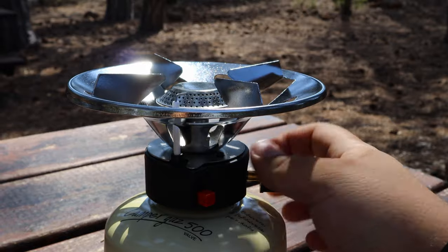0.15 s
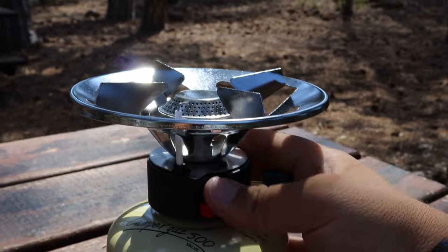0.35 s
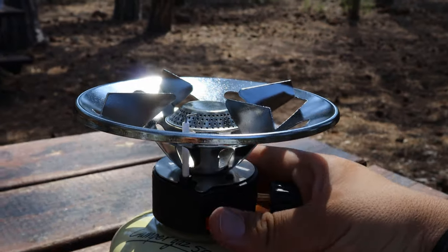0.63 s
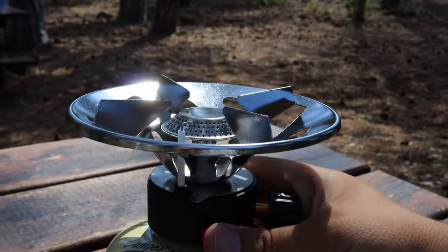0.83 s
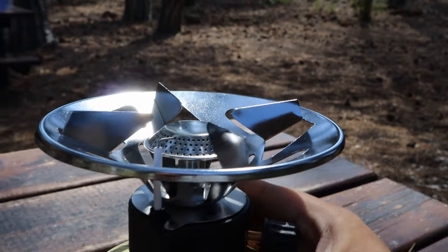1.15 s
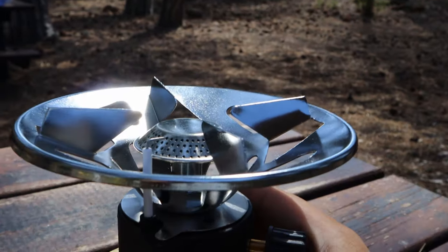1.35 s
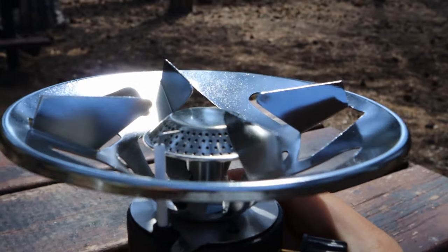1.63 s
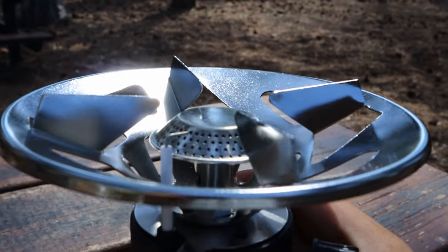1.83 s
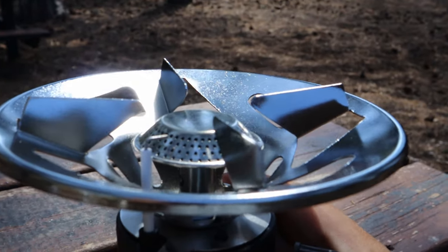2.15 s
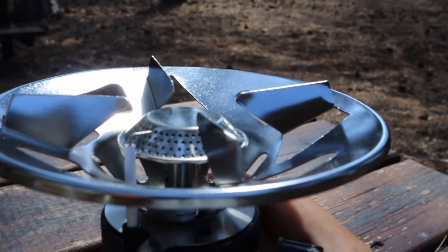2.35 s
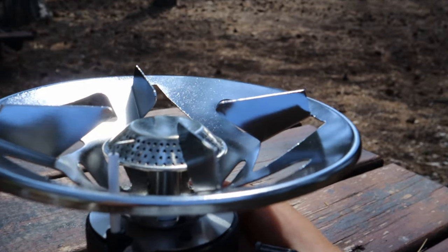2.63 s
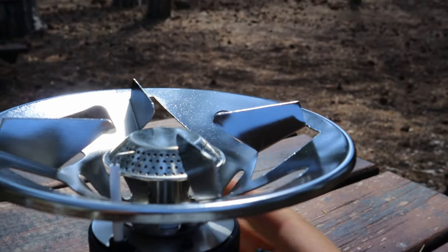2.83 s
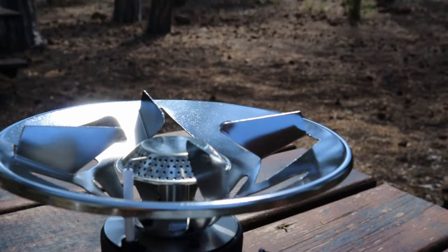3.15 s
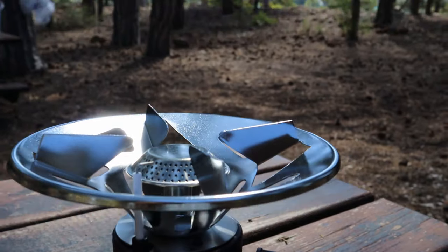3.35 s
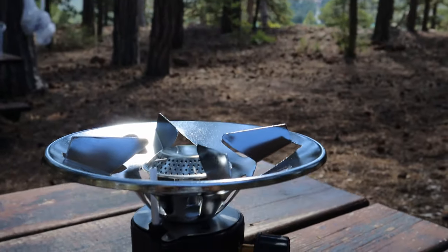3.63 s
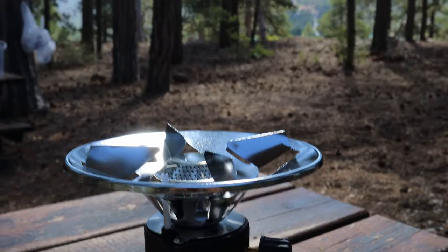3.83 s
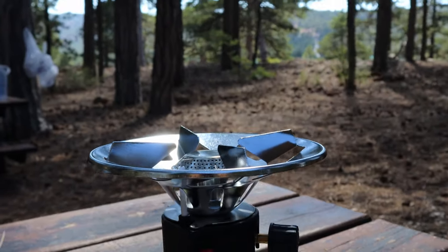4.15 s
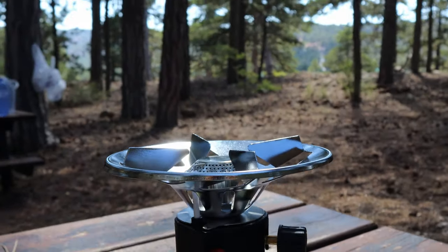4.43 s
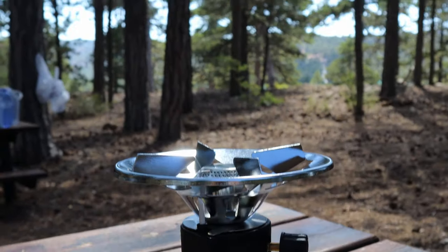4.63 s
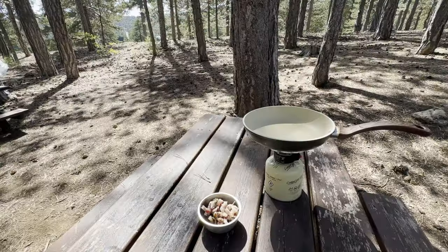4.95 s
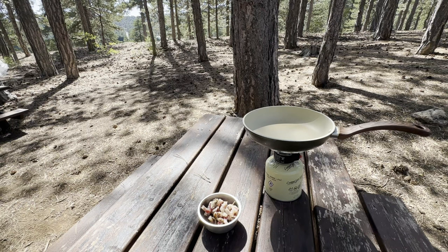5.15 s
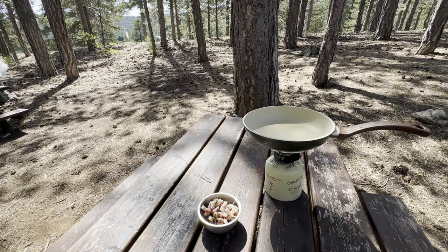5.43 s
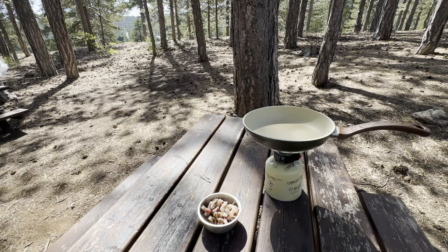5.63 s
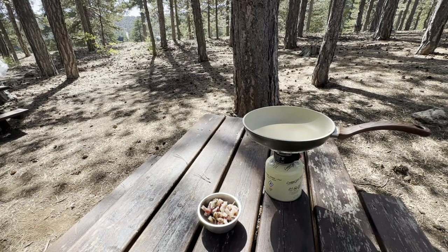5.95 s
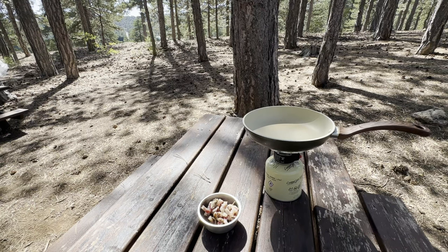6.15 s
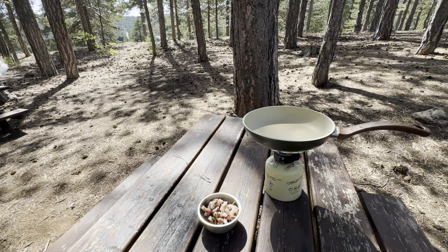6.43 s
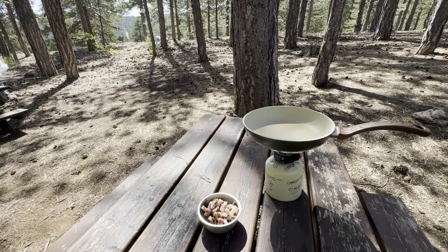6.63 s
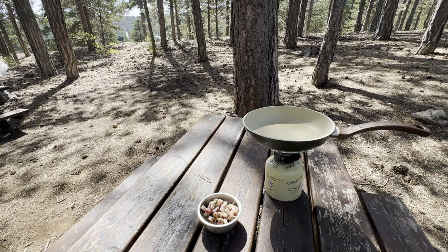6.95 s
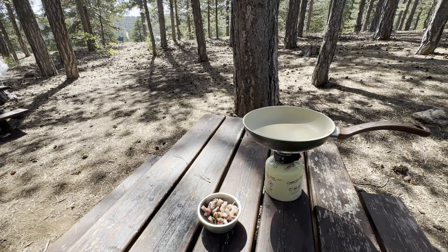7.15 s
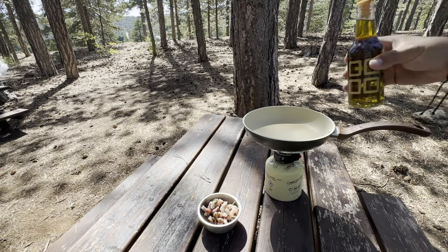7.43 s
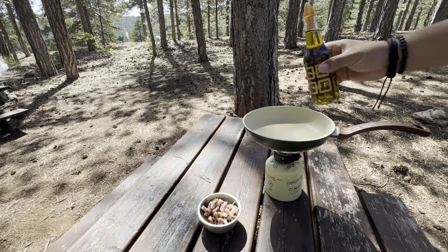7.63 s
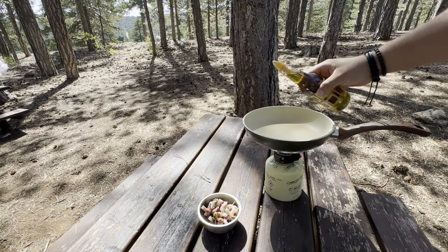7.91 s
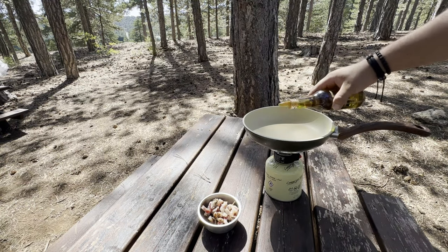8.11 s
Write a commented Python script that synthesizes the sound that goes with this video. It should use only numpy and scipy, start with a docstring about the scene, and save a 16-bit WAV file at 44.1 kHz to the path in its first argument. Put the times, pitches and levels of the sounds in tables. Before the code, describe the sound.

A bright, resonant gas jet blows near the microphone, rising in small steps while a hand faintly rubs and bumps the knob. A hard snap lights it; a second, softer click follows as the button springs back. The flame hisses, sizzles, rumbles and pops in gusts. After a sudden cut, the same stove burns thinly at a distance in quiet open air, its roar wavering with the breeze.

```python
"""Gas stove in a wood

Jet noise: cold gas hisses as the valve opens, its resonances gliding as the microphone nears.
Impact: knob, piezo igniter and the button springing back ring the modes of the stove body.
Combustion noise: the lit burner hisses, sizzles, roars and pops, shaped by gusts and swirling air.
After a cut the stove burns quietly under a pan, a few steps away; faint open air lies beneath."""
import sys
import numpy as np
from scipy import signal
from scipy.fft import rfft, irfft, next_fast_len
from scipy.io import wavfile
from scipy.ndimage import map_coordinates

SR = 44100
rng = np.random.default_rng(int(sys.argv[2]) if len(sys.argv) > 2 else 0)


def generate_wav(sig):
    """Save sig (samples, or channels by samples) to the path in sys.argv[1] as 16-bit PCM at SR."""
    pcm = np.round(np.clip(np.atleast_2d(sig).T, -1, 1) * 32767).astype(np.int16)
    wavfile.write(sys.argv[1], SR, pcm)


N = 365148

FRAME = 1024  # samples in a spectral frame
HZ = np.fft.rfftfreq(FRAME, 1 / SR)[:, None]
TIME = np.arange(N) / SR
FRAME_S = signal.stft(TIME, SR, nperseg=FRAME)[1]  # frame times

LIGHT_S, CUT_S = 1.995, 4.83  # the gas catches; the listening place changes
CATCH_S, SPREAD_S = 2.016, 0.029  # the flame spreads round the head at this time, this fast


def amp(db):
    """Level: decibels to amplitude gain."""
    return 10 ** (np.asarray(db) / 20)


def unit(x):
    """Normalization: x at rms 1."""
    return x / np.sqrt(np.mean(x ** 2) + 1e-20)


def along(points):
    """Spectral envelope: each column of a frequency table, joined on a log axis."""
    f, *cols = np.transpose(points)
    return np.array([np.interp(np.log(HZ + 1), np.log(f + 1), c) for c in cols])


def curves(rows, t=TIME):
    """Time envelope: each column of a time table at the times t."""
    s, *cols = np.transpose(rows)
    return np.array([np.interp(t, s, c) for c in cols])


def wobble(rate):
    """Random modulation: a smooth curve of rms 1 with rate knots a second."""
    knots = rng.standard_normal(int(N * rate / SR) + 4)
    return unit(map_coordinates(knots, [TIME * rate]))


def after(s, fade):
    """Smooth onset: rises from 0 to 1 around the time s."""
    return .5 + .5 * np.tanh((TIME - s) / fade)


def bell(hz, width_hz):
    """Resonance: a bump of height 1 on the frequency axis."""
    return 2 ** -(2 * (HZ - hz) / width_hz) ** 2


def swells(rows, attack_s, release_s, t=TIME):
    """Attack and release: events (start, length, values) rise, hold and fall; one curve per value."""
    start, length, *values = np.transpose(rows)[:, :, None]
    rise = 1 + np.tanh((t - start) / attack_s)
    fall = 1 - np.tanh((t - start - length) / release_s)
    return [np.sum(value * rise * fall / 4, axis=0) for value in values]


def rush(colour_db, ports, patchy_db, port_db=0):
    """Turbulence: coloured noise of rms 1 with drifting patches, partly coherent between two ports."""
    a, b = signal.stft(rng.standard_normal((2, N)), nperseg=FRAME)[2]
    patch_shape = np.outer(np.hanning(20), np.hanning(13))
    patches = signal.fftconvolve(rng.standard_normal(a.shape), patch_shape, "same")
    gain = amp(colour_db + patchy_db * unit(patches))
    # each frame keeps its total power; port_db then colours each port apart
    gain = gain / np.linalg.norm(gain, axis=0) * amp(port_db)
    pan_db, coherence, lag = along(ports)
    turn = np.arccos(np.clip(coherence, 0, 1)) / 2
    shared, apart = np.cos(turn) * a, np.sin(turn) * b
    lean = amp(pan_db / 2) * np.exp(-.5j * lag)
    pair = np.array([(shared + apart) * lean, (shared - apart) / lean])
    pair = pair / np.hypot(abs(lean), 1 / abs(lean))
    return unit(signal.istft(pair * gain, nperseg=FRAME)[1][:, :N])


def flame(colour_db, ports, flutter_db, flutter_rate):
    """Combustion noise: turbulence whose level comes in quick, uneven puffs."""
    puffs = amp(flutter_db * wobble(flutter_rate))
    return unit(rush(colour_db, ports, patchy_db=2.0) * puffs)


def lit_burner():
    """Superposition: burner hiss, plus a roar that sets in as the flame spreads round the head."""
    return lit_hiss() + after(CATCH_S, SPREAD_S) * flame_roar()


# wind gusts tear at the flame, and the button springing back shakes it at 2.48 s; it calms in the lulls: # t/s,
# length/s, roar rise/dB, rasp/dB, bass/dB
GUST_EVENTS = [(2.06, 0.15, 2.5, 9, 0), (2.36, 0.14, 5, -5, -16), (2.48, 0.091, 5.5, -5, -7),
               (2.62, 0.071, 6, 6.5, 6), (2.82, 0.09, 6, 5, 8), (2.92, 0.066, 7.5, 4, 8.5),
               (3.02, 0.31, -3, 5, 5), (3.28, 0.26, 7.5, 3.5, 3.5), (3.79, 0.055, 12.5, 4, -7),
               (3.89, 0.11, 4.5, -15, -8), (3.99, .06, -5.5, 6, 5), (4.07, 0.11, 3.5, 4.5, 3),
               (4.44, 0.12, 3.5, -11, 0), (4.61, 0.089, 10, 0.5, -6), (4.79, 0.11, 5.5, -2, 6),
               (5.42, 0.04, 9.5, 0, 0), (6.66, 0.043, 4.5, -3, 0), (6.83, 0.15, 5, 0, -1),
               (7.72, 0.032, 6, 4, 2)]


def gusts(t):
    """Forcing by wind and by the button's knock: rise of the roar, of its rasp and of its bass in dB at the
    times t."""
    return swells(GUST_EVENTS, attack_s=0.014, release_s=0.039, t=t)


# spectrum of the close roar: f/Hz, level/dB
ROAR_SPECTRUM = [(20, -36), (50, -13), (100, -8.5), (160, -0.5), (220, -0.5), (320, -3), (430, -10),
                 (680, -8.5), (900, -17), (1400, -17), (2000, -24), (3000, -40), (9000, -85)]
# the two ports beside the lit burner: f/Hz, left minus right/dB, coherence/1, left lag/rad
LIT_PORT_PAIR = [(200, 0, .99, 0), (600, -2.3, .98, 0), (1100, -5.5, .82, -.2), (1950, -2, .75, .2),
                 (2400, -6, .8, .4), (2850, -19, .7, 1.4), (3400, -8, .8, .3), (4300, -3, .8, .65),
                 (5100, 2, .82, 1.1), (5900, 3, .9, 2), (7100, 4, .75, 2.3), (8000, 2, .92, 2.8),
                 (8500, 0, 1, 3.14), (9400, 0, 1, 3.14), (10000, .5, .98, 3.11), (11700, .5, .965, 3.07),
                 (12400, 0, 1, 3.14)]
ROAR_DB, ROAR_BASS_DB, ROAR_RASP_DB = -33, -0.5, -3  # between gusts: level, bass, rasp


def flame_roar():
    """Combustion noise: the close flame roars, each gust changing its level and colour."""
    _, rasp_db, bass_db = gusts(FRAME_S)
    bass_tone_db = (ROAR_BASS_DB + bass_db) * bell(100, width_hz=130)
    rasp_tone_db = (ROAR_RASP_DB + rasp_db) * bell(1180, width_hz=820)
    colour_db = along(ROAR_SPECTRUM)[0] + bass_tone_db + rasp_tone_db
    roar = flame(colour_db, LIT_PORT_PAIR, flutter_db=1.3, flutter_rate=70)
    return amp(ROAR_DB + gusts(TIME)[0]) * roar


# the head swishes, or briefly falls away, as hot air swirls round it:
# t/s, length/s, head/dB, broad rush/dB, pot support ring/dB
SWISH_EVENTS = [(2.05, 0.086, 13.5, 2, 1), (2.16, .04, 8, -1, 0), (2.37, 0.084, 12, 4.5, 2),
                (2.46, 0.062, -8, 1.5, 0), (2.535, 0.081, 8.5, -1, -6), (2.67, .11, 7.5, -1.5, 15),
                (2.79, 0.094, 6.5, -1, -3), (2.9, 0.058, 4, -3.5, 1), (3.055, 0.18, 11.5, 2, 1),
                (3.23, 0.062, 6, -1.5, 5), (3.94, 0.095, -1, 0, 8), (4.06, 0.052, -6, -5.5, 7),
                (4.14, 0.086, 1, 0, 4)]


def swishes(t=TIME):
    """Turbulent modulation: change of head, of rush and of pot support ring in dB at the times t."""
    return swells(SWISH_EVENTS, attack_s=0.027, release_s=0.02, t=t)


# steady hiss as the microphone moves round the burner: t/s, rush level/dB, head level/dB
HISS_LEVELS = [(2.1, -26.5, -35), (2.42, -25.5, -29.5), (2.9, -27.5, -28.5), (3.1, -24.5, -29.5),
               (3.45, -23, -25.5), (3.7, -22.5, -24.5), (4.05, -24, -19), (4.3, -23.5, -20.5),
               (4.8, -26, -23)]
# wandering resonances of the hot burner: t/s, head f/Hz, tube f/Hz, sizzle f/Hz
BURNER_RESONANCES = [(2.1, 6300, 3950, 11700), (2.2, 5750, 3850, 11500), (2.32, 6000, 3780, 11200),
                     (2.44, 5680, 3780, 11000), (2.54, 6120, 4000, 11300), (2.6, 5900, 4050, 11350),
                     (2.73, 6280, 4080, 11900), (2.93, 5780, 3800, 11500), (3.14, 5900, 4150, 11650),
                     (3.27, 6080, 4200, 11400), (3.56, 5700, 4000, 11100), (3.9, 5780, 4150, 11050),
                     (4.05, 6020, 4340, 11750), (4.22, 6020, 3450, 11650), (4.5, 5800, 3550, 11050),
                     (4.75, 5930, 3680, 11350)]
# the microphone leans in to the burner and draws back: t/s, closeness/1
MIC_CLOSENESS = [(2.1, 0), (2.5, 0.9), (2.92, 0.9), (3.08, 0.25), (4.1, 0.15), (4.8, 0.2)]
# narrow bands lifted by the steel pot support: f/Hz, width/Hz, level/dB
SUPPORT_BANDS = [(2250, 500, 2.5), (2900, 260, 0.5), (5000, 320, 4.5), (6900, 400, 6.5)]
# spectra of the broad rush and of the burner head: f/Hz, level/dB
RUSH_SPECTRUM = [(400, -11), (1000, -27), (1600, -9.5), (1950, -16.5), (2400, -7), (3300, 1.5), (4000, 2.5),
                 (4700, 2.5), (6000, -7.5), (7500, -13), (9000, -59), (13000, -43)]
HEAD_SPECTRUM = [(3500, -37.5), (4800, 3.5), (5400, 12.5), (6250, 6.5), (6750, -6), (7500, -7), (8500, -56),
                 (12000, -60)]
GUST_DUCK = 0.057  # dB of rush and head lost per dB of roar gained
DIP_DB, RECOVER_S, RECOVER_FADE_S = -10, 2.055, .016  # the hiss dips briefly after the click, then recovers
# drawn back, the right port hears a reflection cancel one band
SHADOW_DB, SHADOW_S, SHADOW_HZ, SHADOW_WIDTH_HZ = -7, 4.6, 4400, 120


def lit_hiss():
    """Resonant jet noise: dipping after the click, it swishes in hot air while its resonances wander."""
    swish_db, surge_db, _ = swishes()
    rush_db, head_db = curves(HISS_LEVELS) + [surge_db, swish_db] - GUST_DUCK * gusts(TIME)[0]
    head_hz, tube_hz, sizzle_hz = curves(BURNER_RESONANCES, FRAME_S)
    close, = curves(MIC_CLOSENESS, FRAME_S)
    # right at the burner the resonances stand out, and the hiss between them turns hollow
    hollow_db = -10 * close * bell(1.17 * tube_hz, width_hz=550)
    hollow_db = hollow_db - 6 * close * bell(0.887 * head_hz, width_hz=840)
    head_ring_db = (4 + 5 * close) * bell(head_hz, width_hz=580)
    tube_ring_db = (2 + 4 * close) * bell(tube_hz, width_hz=580)
    support_ring_db = swishes(FRAME_S)[2] * bell(4800, width_hz=300)
    support_db = sum(db * bell(hz, width) for hz, width, db in SUPPORT_BANDS) + support_ring_db

    drawn_back = np.interp(FRAME_S, TIME, after(SHADOW_S, fade=0.042))
    shadow_db = SHADOW_DB * drawn_back * bell(SHADOW_HZ, SHADOW_WIDTH_HZ)
    # the tube faces the right port
    port_db = np.array([0.83 * tube_ring_db, tube_ring_db + shadow_db])
    body_colour_db = along(RUSH_SPECTRUM)[0] + support_db + hollow_db
    body = amp(rush_db) * rush(body_colour_db, LIT_PORT_PAIR, patchy_db=1.5, port_db=port_db)

    head_colour_db = along(HEAD_SPECTRUM)[0] + head_ring_db + support_ring_db + hollow_db
    head = amp(head_db) * rush(head_colour_db, LIT_PORT_PAIR, patchy_db=4.0)
    # up close, the head faces the left port
    head = head * amp(np.outer([1.2, -6.5], curves(MIC_CLOSENESS)[0]))
    head = head * amp(1.07 * wobble(rate=35))  # flutter

    dip = amp(DIP_DB * (1 - after(RECOVER_S, RECOVER_FADE_S)))
    return dip * (body + head + burner_sizzle(sizzle_hz, swish_db))


# fine sizzle before swish and flicker: t/s, level/dB
SIZZLE_LEVELS = [(2.14, -36), (2.26, -42), (2.34, -35.5), (2.45, -39), (2.75, -38.5), (2.93, -42),
                 (3.2, -32), (3.45, -30.5), (3.7, -33.5), (4.1, -34), (4.24, -30), (4.5, -33.5),
                 (4.8, -35.5)]
# its spectrum: f/Hz, level/dB
SIZZLE_SPECTRUM = [(5000, -40), (7800, -5), (8700, -8), (9400, -7), (10200, -1.5), (11200, -2), (12000, -8),
                   (12800, -24), (13900, -19), (15200, -45)]
SIZZLE_FOLLOWS = 0.25  # dB of sizzle per dB of swish


def burner_sizzle(sizzle_hz, swish_db):
    """Fine-scale turbulence: flickering treble noise with a wandering resonance."""
    level_db = curves(SIZZLE_LEVELS)[0] + SIZZLE_FOLLOWS * swish_db + 3.9 * wobble(rate=32)
    ring_db = 8 * bell(sizzle_hz, width_hz=620)
    return amp(level_db) * rush(along(SIZZLE_SPECTRUM)[0] + ring_db, LIT_PORT_PAIR, patchy_db=2.5)


# the loud pops of the flame: t/s, peak level/dB
LOUD_POPS = [(1.989, -26), (2.51, -20), (2.947, -19), (2.965, -18), (3.467, -18), (3.514, -15.5),
             (3.819, -17), (3.838, -15.5), (3.9206, -14), (4.637, -15), (4.673, -13.5)]
POP_S, SMALL_POP_DB = 0.00068, -27.5  # typical half length; typical small peak between gusts


def flame_pops():
    """Volume collapse: pockets of flame give dull pulses, the many small ones growing with the gusts."""
    times = rng.uniform(CATCH_S + SPREAD_S, CUT_S, size=110)
    levels = SMALL_POP_DB + gusts(times)[0] + rng.normal(0, 1.7, len(times))
    out = np.zeros(N)
    for s, db in [*LOUD_POPS, *zip(times, levels)]:
        near = slice(round((s - .01) * SR), round((s + .01) * SR))
        half_s = POP_S * np.exp(rng.normal(0, .14))
        u = (TIME[near] - s) / half_s
        out[near] -= amp(db) * (1 - u ** 2) * np.exp(-u ** 2 / 2)
    return out


# resonances of the cold hiss glide, most of them downward, as the microphone nears:
# f at first/Hz, f at lighting/Hz, width/Hz, level/dB
JET_RESONANCES = [(1560, 1360, 230, 7), (2200, 2320, 130, 2), (3190, 2400, 540, 4.5), (4260, 4000, 170, 3),
                  (5560, 5390, 660, 8.5)]
# reflections shape gliding bands as the microphone nears:
# f at first/Hz, f at lighting/Hz, width/Hz, left level/dB, right level/dB
GLIDING_BANDS = [(2590, 1950, 270, 1, -4), (3750, 3500, 200, -1.5, -2.5), (3640, 2700, 490, -5, 0),
                 (7650, 6900, 600, -1.5, -3)]
# spectrum of the cold jet: f/Hz, level/dB
JET_SPECTRUM = [(100, -26), (300, -21.5), (1000, -19.5), (1900, -16), (3000, -5.5), (4500, -2.5),
                (5700, -6), (7000, -8), (8600, -15), (9800, -3.5), (10800, 1), (11400, -18), (12200, -21),
                (12800, -29), (13400, -25), (14000, -31), (14400, -55)]
# the two ports before lighting: f/Hz, left minus right/dB, coherence/1, left lag/rad
JET_PORT_PAIR = [(200, 0, .93, 0), (900, -3, .65, .1), (1500, -7, .85, .2), (2200, -5.5, .8, .4),
                 (2900, -13, .8, 1.2), (3400, -7, .9, .3), (4300, -2, .92, .45), (5600, 3, .96, 1.35),
                 (7000, 4, .87, 2.1), (8500, 0, .99, 3), (10500, 1.5, .98, 3), (11200, 0, .999, 3.14)]
# each turn of the valve lets more gas through: t/s, rise/dB
VALVE_TURNS = [(.26, 1.0), (1.04, 1.38), (1.42, 1.35), (1.72, 1.5)]
JET_DB, TURN_S = -20.5, 0.061  # hiss before the turns; how gradually a turn takes hold


def unlit_jet():
    """Jet noise: cold gas blows through the mixer tube; resonances glide as the microphone nears."""
    glide = np.clip(FRAME_S / LIGHT_S, 0, 1) ** 2.0  # 0 at first, 1 at lighting
    resonance_db, bands_db = 0, 0
    for first, last, width, db in JET_RESONANCES:
        resonance_db = resonance_db + db * bell(first + (last - first) * glide, width)
    for first, last, width, *sides_db in GLIDING_BANDS:
        bands_db = bands_db + np.multiply.outer(sides_db, bell(first + (last - first) * glide, width))
    colour_db = along(JET_SPECTRUM)[0] + resonance_db
    hiss = rush(colour_db, JET_PORT_PAIR, patchy_db=0.9, port_db=bands_db)
    opened_db = sum(db * after(s, TURN_S) for s, db in VALVE_TURNS)
    return hiss * amp(JET_DB + opened_db + 0.15 * wobble(24.46))


# valve knob and igniter knock the stove:
# t/s, relative level/dB, contact brightness f/Hz, crack/dB, thud/dB
STOVE_KNOCKS = [(.9, -28, 650, -45, 8), (1.126, -20.5, 640, -45, 9), (1.171, -28, 650, -45, 9),
                (1.9863, -10.5, 6000, 5.5, 1), (2.483, -12, 2600, -0.5, 5.5)]
# modes of the stove body: f/Hz, level/dB, t60/s, left minus right/dB
BODY_MODES = [(743, -8.5, .055, -2.5), (1480, 2.5, .018, -7), (1870, -17, .06, -4), (2390, -12, .05, -3),
              (2810, -19.5, .25, -6), (3074, 0, .016, -6), (3410, -10, .035, -5), (4064, -11, .05, -4),
              (4200, 9, .011, -4), (5146, -21, .1, 2), (5900, 6, .012, 5), (6503, -21, .08, 3)]
CRACK_S, RATTLE_S, RATTLE_DB = .009, .1, -22  # t60 of the blow; t60 and level of rattling loose parts
THUD_BELOW_HZ = 1000  # a thud lifts the modes under this pitch


def knocks():
    """Modal impact: blows ring the body; hard contacts crack, soft ones stir chiefly its lowest mode."""
    out, t = np.zeros((2, N)), np.arange(SR // 3) / SR
    hz, mode_db, t60, pan_db = np.transpose(BODY_MODES)[:, :, None]
    for s, db, bright_hz, crack_db, thud_db in STOVE_KNOCKS:
        blow_db = mode_db + thud_db * (hz < THUD_BELOW_HZ) + rng.normal(0, 1.0, hz.shape)
        strength = amp(blow_db) / np.hypot(1, (hz / bright_hz) ** 2)
        life = amp(-60 * t / t60) * (1 - np.exp(-t * hz))  # each mode builds up over about one cycle
        modes = strength * life * np.sin(2 * np.pi * (hz * t + rng.random(hz.shape)))
        ring = amp(np.hstack([pan_db, -pan_db]).T / 2) @ modes

        edges_hz = [1300, np.clip(2 * bright_hz, 2500, 13000)]
        b, a = signal.butter(2, edges_hz, "band", fs=SR)
        snap = signal.lfilter(b, a, rng.standard_normal((3, len(t))))
        stereo_snap = unit(snap[0] + 2.0 * snap[1:])  # one shared noise, one for each port
        dying = amp(-60 * t / CRACK_S) + amp(RATTLE_DB - 60 * t / RATTLE_S)
        crack = amp(crack_db) * dying * (1 - np.exp(-t / 0.00022)) * stereo_snap
        out[:, round(s * SR):][:, :len(t)] += amp(db) * (ring + crack)
    return out


# the hand on the valve knob rubs faintly: t/s, level/dB
HAND_LEVELS = [(.35, -84), (.6, -54), (.78, -47), (1.0, -51), (1.2, -57), (1.5, -69)]
# spectrum of the rubbing: f/Hz, level/dB
HAND_SPECTRUM = [(100, -32), (170, -20), (220, 6), (290, -8), (500, -32), (1000, -55)]


def hand():
    """Friction noise: fingers turning the knob make the canister rumble."""
    rumble = rush(along(HAND_SPECTRUM)[0], JET_PORT_PAIR, patchy_db=0)
    return amp(curves(HAND_LEVELS)[0]) * rumble


# the breeze sets the distant roar, to which gusts add: t/s, level/dB
BREEZE_LEVELS = [(5.04, -58), (5.17, -44.5), (5.47, -48), (5.66, -59), (5.98, -51), (6.22, -45.5),
                 (6.85, -44.5), (8.27, -44.5)]
# the distant hiss swells slowly as the air moves: t/s, level/dB, ring of the burner head/dB
FAR_HISS_LEVELS = [(4.9, -44, 1), (5.4, -44, -1), (5.9, -43.5, 3), (6.4, -44.5, -2), (6.7, -44, -1),
                   (7.0, -46, -2), (7.45, -44.5, -2.5), (7.9, -43.5, 2), (8.27, -44.5, 3)]
# reflections from pan and table cancel narrow bands: f/Hz, width/Hz, level/dB
PAN_NOTCHES = [(2080, 330, -10), (3110, 170, -15), (3650, 130, -6), (4180, 120, -6), (5220, 150, -11),
               (5850, 200, -3), (7570, 260, -13)]
# spectra of the distant hiss, sizzle and roar: f/Hz, level/dB
FAR_HISS_SPECTRUM = [(400, -20), (1000, -15.5), (1500, -16.5), (2200, -17.5), (2750, -15.5), (3300, -16),
                     (4000, -8), (4900, -3.5), (5900, -3), (6350, 1.5), (7150, -4), (8300, -19),
                     (9200, -33), (12000, -45)]
FAR_SIZZLE_SPECTRUM = [(8500, -38), (9700, -11), (10400, 0), (11500, 3), (12200, 0), (12900, 1),
                       (13500, -8), (14700, -3), (15400, -1), (15900, -1.5)]
FAR_ROAR_SPECTRUM = [(25, -30), (55, -15), (95, -17.5), (180, 0.5), (300, -0.5), (410, 2), (530, -7),
                     (680, -19.5), (1100, -32), (2000, -33), (4000, -59)]
# the two ports a few steps away: f/Hz, left minus right/dB, coherence/1, left lag/rad
FAR_PORT_PAIR = [(150, 0, .96, 0), (430, 2.5, .95, .15), (750, -7, .5, .9), (1100, -3, .85, .3),
                 (1600, -6, .65, .8), (2700, -1, .8, 0), (4200, -1, .75, -.5), (5100, 4, .65, -.9),
                 (6000, 7, .78, -2.7), (7400, 9, .6, -1), (8500, 0, .6, .3), (10200, 0, .99, 0)]
# the flame turns raspier at the height of the breeze: by how much, when, half length to 1/e
FAR_RASP_DB, FAR_RASP_S, FAR_RASP_SPAN_S = 14.5, 7.23, 0.66
FAR_SIZZLE_DB, FAR_SIZZLE_FOLLOWS = -55, 0.21  # level in the full breeze; dB per dB of breeze


def distant_burner():
    """Interference and forcing: pan and table notch the hiss while the flame flutters in the breeze."""
    breeze_db, = curves(BREEZE_LEVELS)
    notch_db = sum(db * bell(hz, width) for hz, width, db in PAN_NOTCHES)
    ring_db = curves(FAR_HISS_LEVELS, FRAME_S)[1] * bell(5000, width_hz=960)
    hiss_colour_db = along(FAR_HISS_SPECTRUM)[0] + notch_db + ring_db
    hiss = amp(curves(FAR_HISS_LEVELS)[0]) * rush(hiss_colour_db, FAR_PORT_PAIR, patchy_db=1.5)

    sizzle_db = FAR_SIZZLE_DB + FAR_SIZZLE_FOLLOWS * (breeze_db - breeze_db.max()) + 0.83 * wobble(3.2)
    sizzle = amp(sizzle_db) * rush(along(FAR_SIZZLE_SPECTRUM)[0], FAR_PORT_PAIR, patchy_db=4.5)

    windy = np.exp(-((FRAME_S - FAR_RASP_S) / FAR_RASP_SPAN_S) ** 2)
    rasp_db = FAR_RASP_DB * windy * bell(1040, width_hz=590)
    roar_colour_db = along(FAR_ROAR_SPECTRUM)[0] + rasp_db
    roar = flame(roar_colour_db, FAR_PORT_PAIR, flutter_db=1.45, flutter_rate=60)
    return hiss + sizzle + amp(breeze_db + gusts(TIME)[0]) * roar


# spectrum of the open air: f/Hz, level/dB
AIR_SPECTRUM = [(20, -9), (52, 3), (90, -6), (130, 2), (200, -5.5), (400, -31), (1500, -34)]


def forest_air():
    """Ambient turbulence: a low rumble of open air."""
    return rush(along(AIR_SPECTRUM)[0], JET_PORT_PAIR, patchy_db=-2.0)


def scene():
    """Superposition and crossfade: unlit gas, then the close flame, then the stove from further off."""
    lit, away = after(LIGHT_S, fade=0.0029), after(CUT_S, fade=0.001)
    air = forest_air()
    burner = (1 - lit) * unlit_jet() + lit * lit_burner()
    close = burner + flame_pops() + knocks() + hand() + amp(-50.0) * air
    distant = distant_burner() + amp(-59.0) * air
    return (1 - away) * close + away * distant


def record(dry):
    """Band limiting and saturation: cuts the deepest bass, rounds peaks near full scale, ends the treble."""
    top_hz = 15800
    trimmed = signal.lfilter(*signal.butter(3, 30, "high", fs=SR), dry)
    held = trimmed / (1 + np.abs(trimmed) ** 12) ** (1 / 12)
    size = next_fast_len(N + SR // 2)
    passed = np.fft.rfftfreq(size, 1 / SR) < top_hz
    return irfft(rfft(held, size) * passed, size)[:, :N]


dry = scene()
out = record(dry)
generate_wav(out)
```